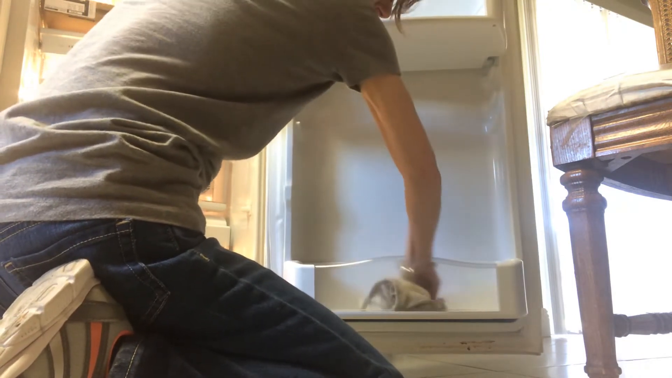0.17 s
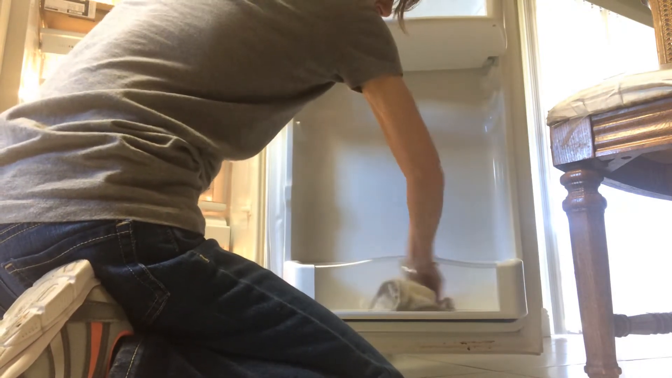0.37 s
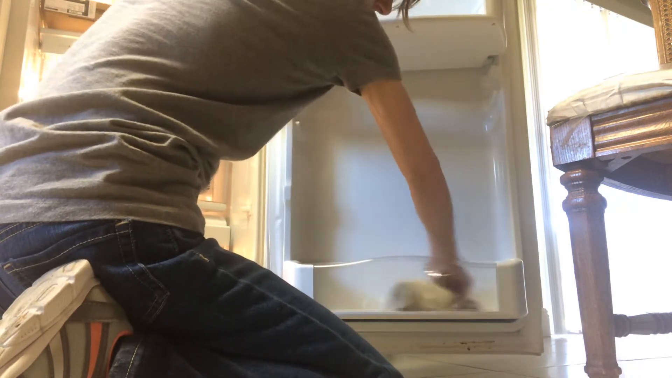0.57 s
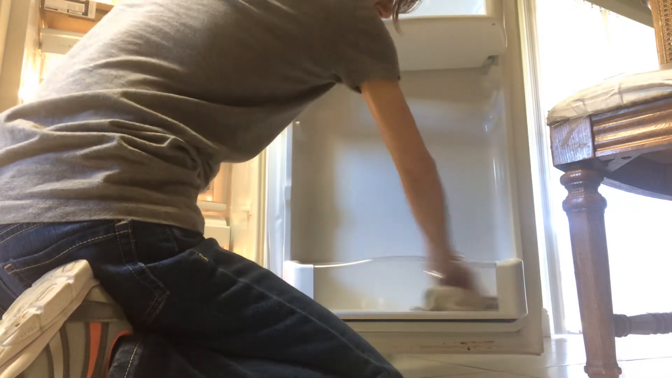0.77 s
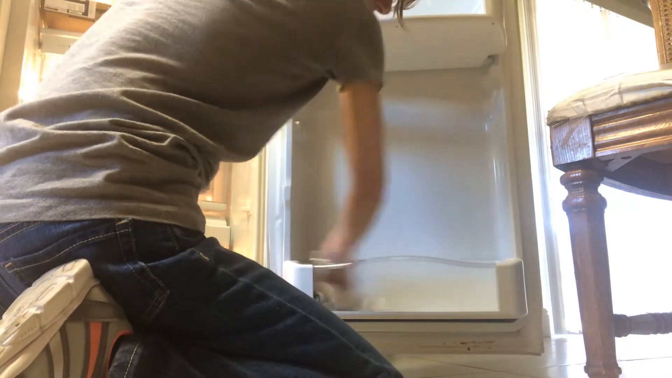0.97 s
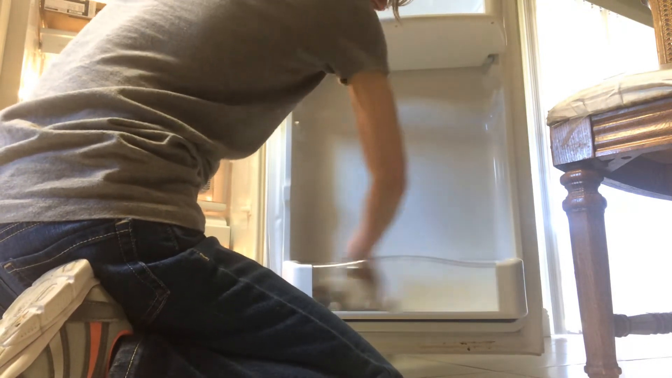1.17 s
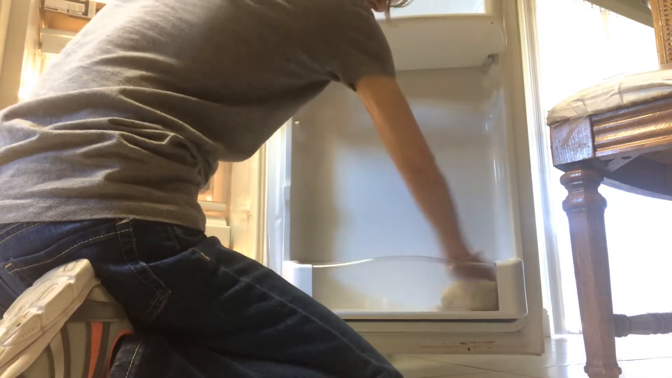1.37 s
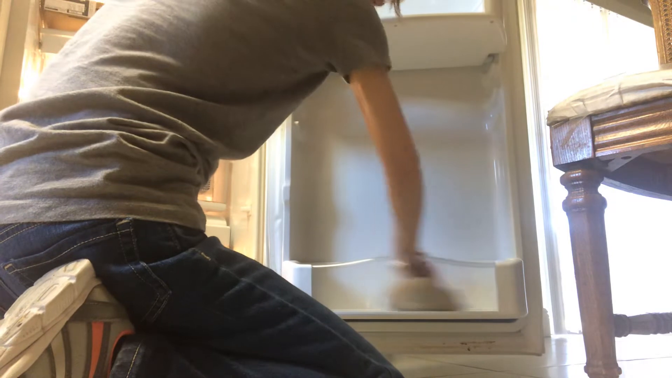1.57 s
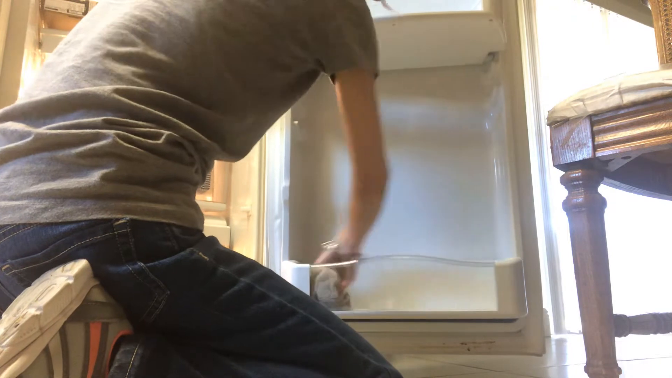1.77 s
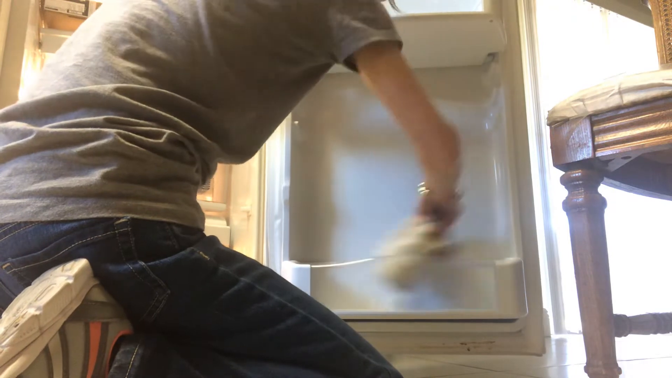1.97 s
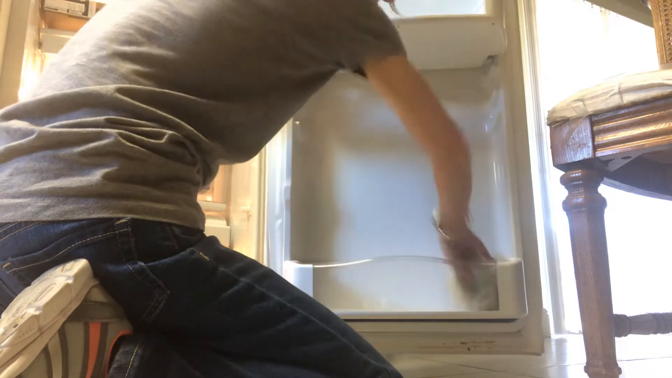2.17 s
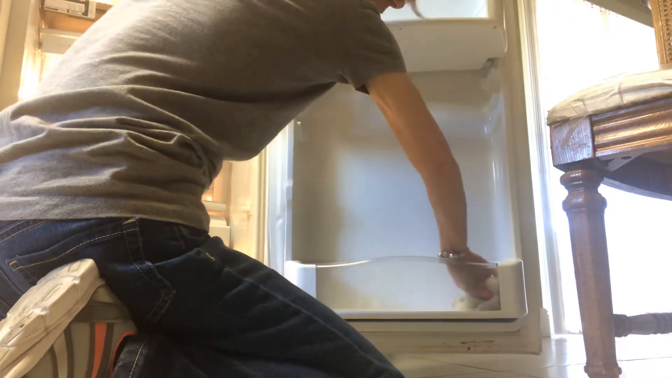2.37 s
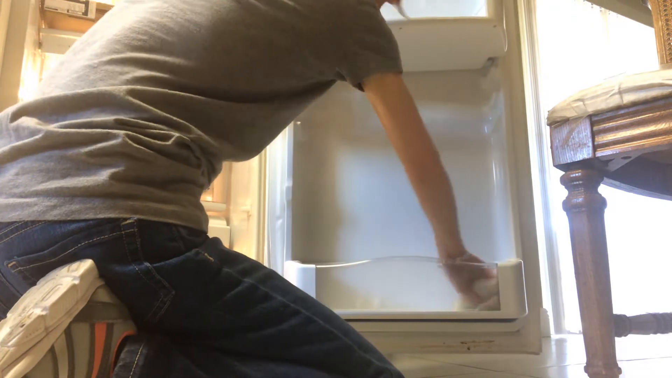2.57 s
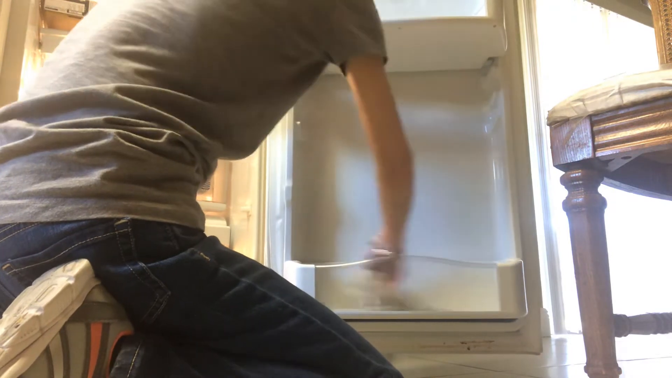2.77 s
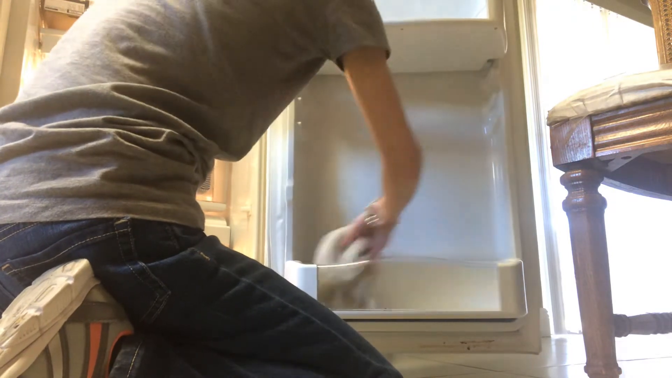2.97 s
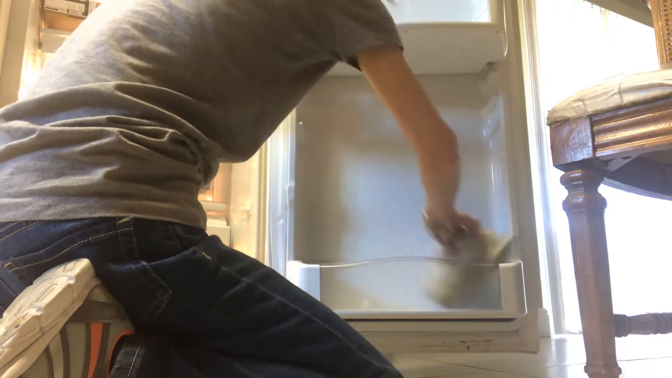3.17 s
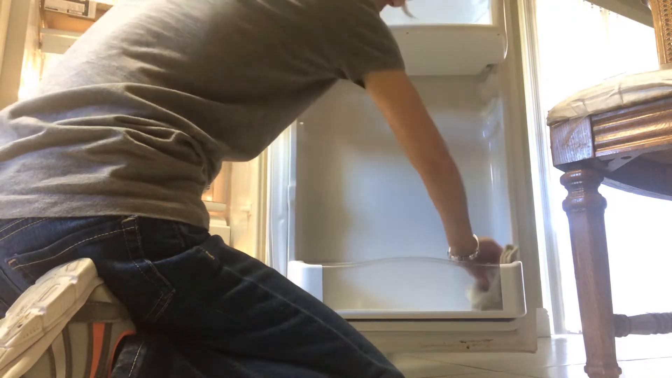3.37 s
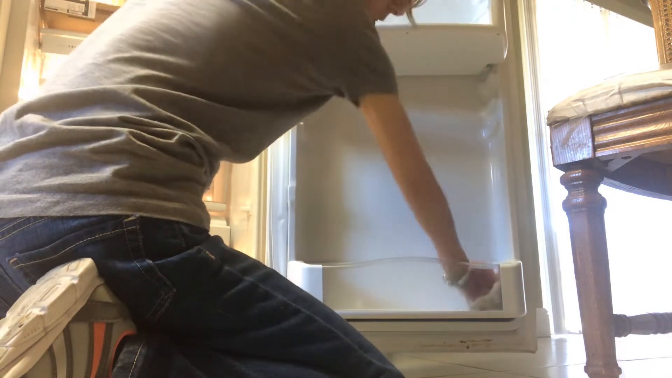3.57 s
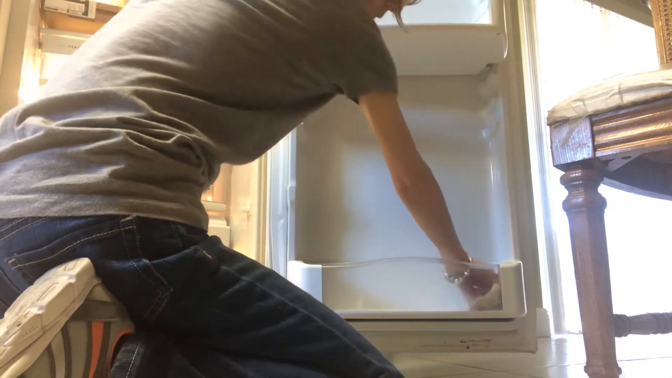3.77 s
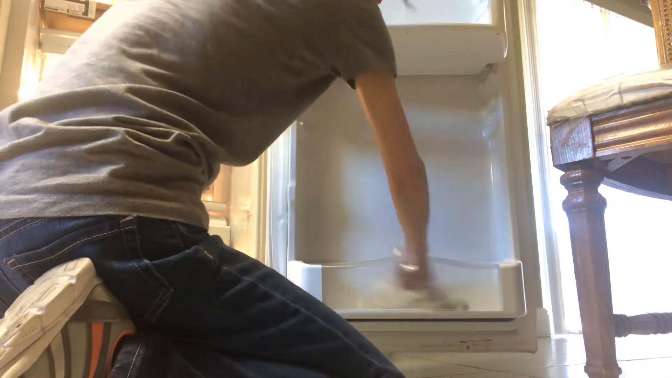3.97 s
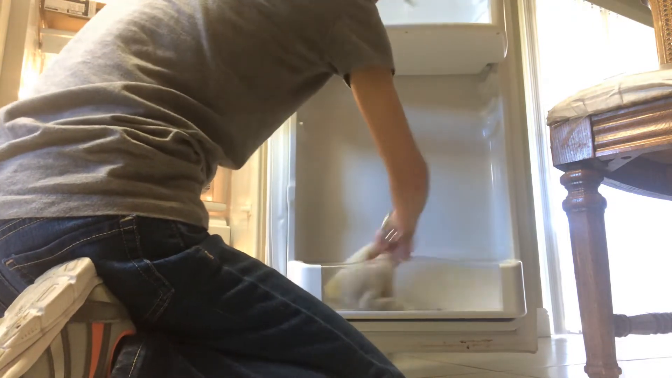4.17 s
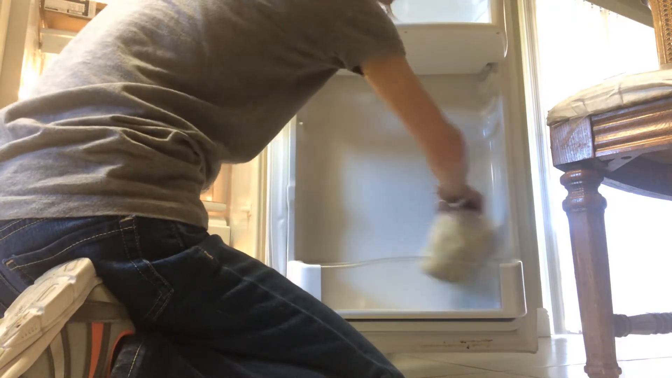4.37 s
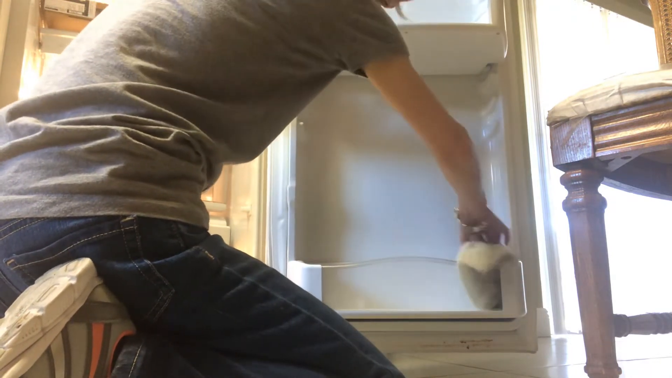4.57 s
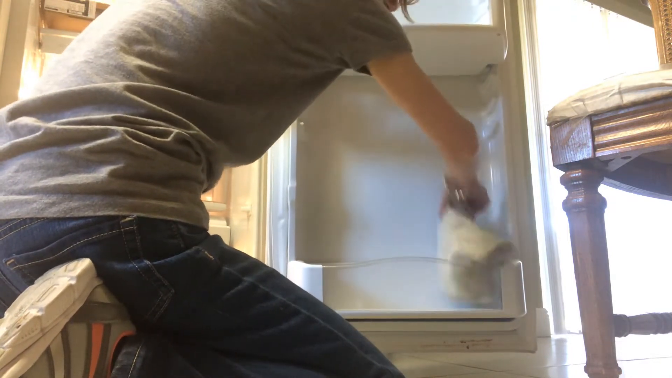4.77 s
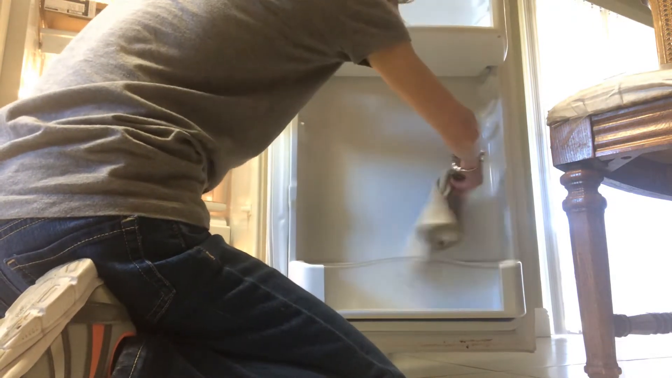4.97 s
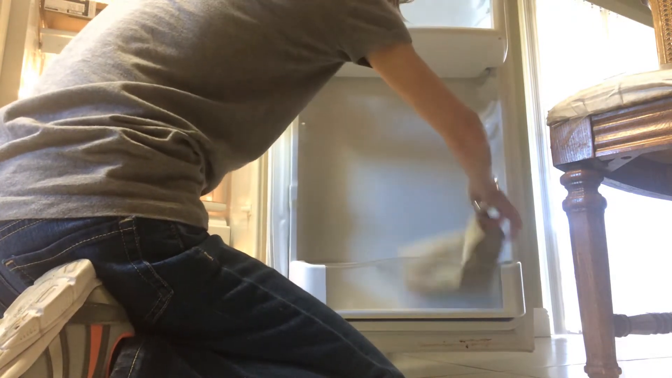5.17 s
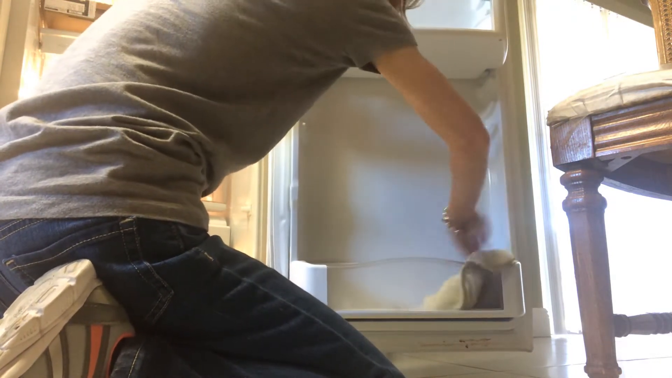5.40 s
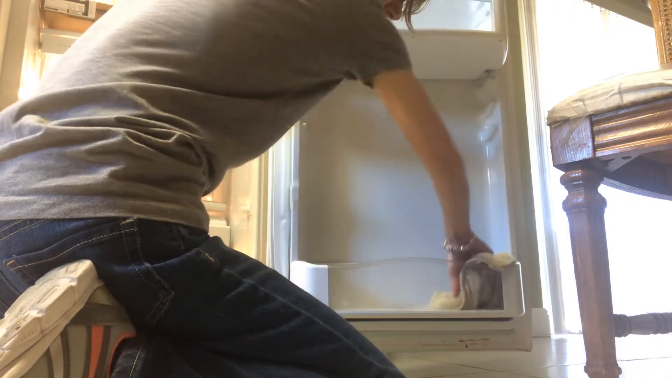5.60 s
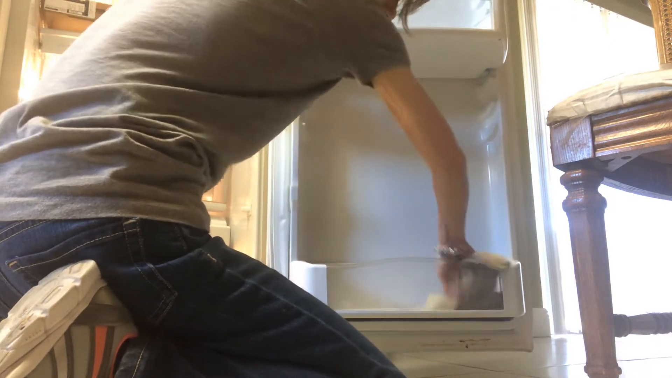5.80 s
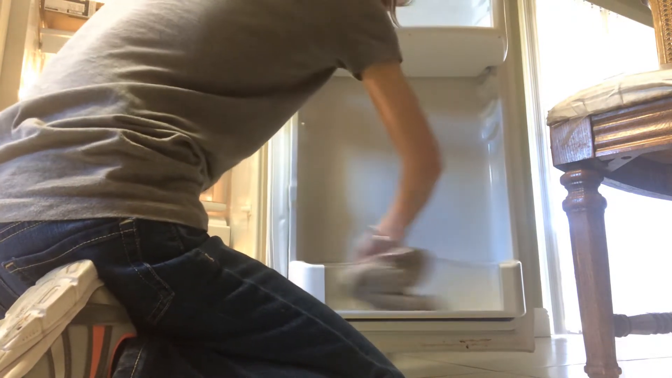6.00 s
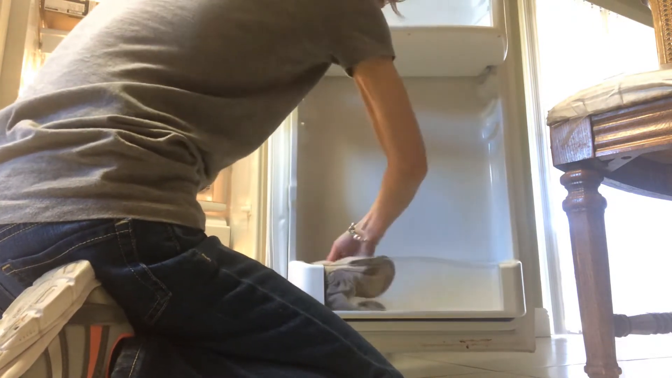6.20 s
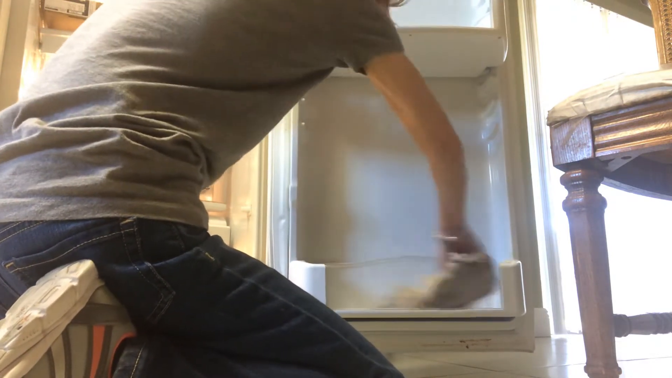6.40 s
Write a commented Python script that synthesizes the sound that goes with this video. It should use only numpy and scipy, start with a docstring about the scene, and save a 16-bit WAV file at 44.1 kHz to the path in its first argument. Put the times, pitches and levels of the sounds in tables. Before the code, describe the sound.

Close by in a quiet, hard-surfaced kitchen, a cloth rubs a plastic refrigerator door bin with faint, breathy strokes. Loud hollow plastic clacks stand out early and at just over two seconds, followed by a short judder and more rattles until about four seconds. After a quieter second, padded hand bumps thud low. A bracelet ticks lightly, and a weak, wavering refrigerator hum continues underneath.

```python
"""A quiet kitchen: a cloth wipes the inside of a plastic refrigerator door bin.
Filtered noise and tiny snags make the cloth's hiss, and low noise the rumble of the door.
The loose bin rings in fading tones and noise as it clacks and judders in its seat. The padded hand
bumps its walls in a few low cycles, and a bracelet ticks in short bright bursts of noise.
The refrigerator hums in wavering sines and a rush of air; the hard room adds a short noise tail."""
import sys
import numpy as np
from scipy import signal
from scipy.fft import rfft, irfft
from scipy.io import wavfile

SR = 44100
rng = np.random.default_rng(int(sys.argv[2]) if len(sys.argv) > 2 else 0)


def to_wav(s):
    """Save 16-bit WAV."""
    ch = np.atleast_2d(s).T  # columns
    pcm = np.round(np.clip(ch, -1, 1) * 32767)  # PCM
    wavfile.write(sys.argv[1], SR, pcm.astype(np.int16))


N = 284004

# the refrigerator's motor and fan, middle level of each wavering line: [f/Hz, rms level/dB]
MOTOR_LINES = [(99, -69.5), (149.5, -58.5), (248.5, -62.5), (432.5, -57), (648.5, -66), (759, -70),
               (866, -80), (1081.5, -64), (1245, -74.5), (1513.5, -76)]
# the rush of air, relative: [f/Hz, density/dB per Hz]
AIR_COLOUR = [(20, -53.5), (38, -26), (47, 2.5), (58, 3), (72, -5.5), (130, -2), (200, -9), (400, -7),
              (550, -9.5), (750, -13.5), (900, -18), (1350, -23), (1900, -26), (4000, -32.5), (7500, -39),
              (9000, -47), (16000, -54)]
# level of the fan's whine over time: [t/s, rms level/dB]
FAN_WHINE = [(0, -61), (1.2, -58), (2.1, -57.5), (3.1, -71.5), (3.9, -64), (4.4, -76), (4.8, -65.5),
             (5.4, -63.5), (6.43, -66)]
# strokes of the cloth, to and fro: [start t/s, length/s, effort level/dB before it sags]
WIPE_STROKES = [(-0.07, .17, -57), (0.182, 0.21, -60), (0.433, 0.34, -56), (0.822, 0.27, -59),
                (1.14, 0.2, -62), (1.445, 0.37, -61), (1.887, .11, -61), (2.188, 0.51, -61),
                (2.575, .36, -59), (3.184, 0.091, -73.5), (3.432, .16, -73), (3.814, .15, -60),
                (3.99, 0.24, -67), (5.113, 0.21, -79.5), (5.443, 0.19, -69.5), (5.756, 0.41, -60.5),
                (6.257, .2, -65)]
# the hand shoves into a corner and the door rumbles, relative: [t/s, level/dB]
CORNER_SHOVES = [(-0.02, -35.5), (1.43, -29.5), (2.70, -40), (5.335, -43.5), (6.34, -45)]
# hiss of the cloth on plastic, relative: [f/Hz, density/dB per Hz]
CLOTH_COLOUR = [(400, -10.5), (1500, -1), (2300, 1.5), (4000, 1), (6000, 1.5), (7600, 4), (8700, -1.5),
                (13000, 0.5), (16000, -4.5)]
# rumble of the door under the hand, relative: [f/Hz, density/dB per Hz]
RUMBLE_COLOUR = [(50, -15.5), (90, 0), (150, -1), (330, -2.5), (480, -4), (700, -22.5), (1500, -18.5),
                 (4000, -57.5)]
# the bracelet ticks on the plastic, relative: [t/s, level/dB]
BRACELET_TICKS = [(0.098, -49), (0.240, -67), (0.479, -60), (1.095, -52), (1.345, -24.5), (1.402, -33),
                  (1.823, -47.5), (1.911, -46.5), (1.929, -45), (2.151, -51.5), (2.198, -51.5),
                  (2.239, -52), (5.523, -45), (5.727, -58.5)]
# the padded hand bumps a wall, before the door joins in: [t/s, level/dB, basic pitch f/Hz, rise time/s]
HAND_BUMPS = [ (0.177, -26.5, 335, 0.0049), (0.231, -26, 324, .01), (0.255, -32, 333, .006),
              (0.422, -29.5, 390, 0.006), (0.484, -32, 353, .0042), (1.192, -37.5, 308, 0.019),
              (1.411, -23, 300, 0.0044), (1.423, -22, 313, 0.0093), (1.718, -39, 402, 0.0066),
              (1.997, -34, 416, 0.012), (2.025, -32.5, 420, .007), (2.235, -36, 405, 0.017),
              (2.634, -20.5, 363, 0.0096), (2.672, -30, 246, 0.0081), (3.282, -38.5, 443, .012),
              (5.182, -34.5, 410, 0.0041), (5.323, -37, 336, 0.01), (5.564, -21, 319, 0.012),
              (5.821, -17.5, 338, 0.0085), (5.86, -36, 220, .0062), (6.304, -27, 349, 0.011)]
# the shudder after a bump, relative: [f/Hz, density/dB per Hz]
SHUDDER_COLOUR = [(70, -14.5), (140, 3.5), (250, 3), (480, 8), (620, -10.5), (1600, -23.5), (3000, -25),
                  (9000, -48.5)]
# the bin knocks, relative: [t/s, level/dB, contact cut-off f/Hz (high when hard),
# low thud level/dB against the strength, ring time factor]
BIN_KNOCKS = [ (0.7365, 2.5, 1114, -9.5, 0.38), (0.747, -10.5, 1100, 2, .8), (1.037, -32, 2780, -5, 0.62),
              (1.14, -19, 2380, 3, 0.42), (1.344, -19, 5800, 5, 1.06), (1.367, -9, 8000, 4.5, 0.44),
              (1.372, -5, 1770, 7.5, 0.59), (2.3258, 2.5, 10500, -1.5, 0.94), (2.339, 0, 1650, 3.5, 0.67),
              (2.436, -8.5, 5740, -3.5, 0.81), (2.527, -19, 3730, 3.5, 1.15),
              (2.579, -14.5, 1690, 0.5, 2.2), (2.632, -9, 1910, 3.5, 1.03), (2.651, -12.5, 4400, -13, 2.47),
              (2.842, -10, 6050, -6, 0.73), (3.342, -12, 3070, 4.5, 1.42), (3.445, -17, 1830, -2.5, 1.3),
              (3.476, -12, 1800, -2.5, 1.9), (3.516, -10, 1780, -1, 1), (3.551, -9.5, 9700, -5.5, 0.83),
              (3.79, -25, 1810, 4, 0.49), (4.119, -5, 3000, 5, 0.84), (4.130, -11, 10960, 6.5, 1.5),
              (5.120, -34, 3370, 1.5, 0.58), (5.343, -24, 1910, 9, 0.73), (5.565, -32, 1720, 5, 2.5),
              (5.826, -22.5, 1900, 16, 0.46), (5.851, -11.5, 2550, 0.5, 0.79)]
# clear tones of the free bin, before a blow changes them: [f/Hz, level/dB, t60/s]
BIN_TONES = [(250, -39, 0.36), (361, -23, 0.23), (417.2, -14, 0.12), (474, -26, 0.13), (517.2, -19, 0.14),
             (760, -24.5, 0.11), (886.6, -32, 0.17), (1099, -34.5, 0.26), (1158, -18.5, 0.063),
             (1413, -24, 0.11), (1580, -23, .12), (1682, -20.5, 0.055), (2770, -28.5, 0.035),
             (2730, -23.5, 0.26), (3125, -28.5, 0.024), (3380, -30, .14), (4170, -27, 0.03),
             (4870, -36.5, 0.052)]
# its crowded higher modes, relative: [f/Hz, density/dB per Hz]
CROWD_COLOUR = [(70, -33), (200, -63.5), (600, 1.5), (900, 1.5), (1600, -7), (2050, -3.5), (2800, -3),
                (3800, -4.5), (4800, -3.5), (7400, -7.5), (8800, -13.5), (12500, -11), (16000, -22.5)]
# their fading time, before a blow's ring factor: [f/Hz, t60/s]
CROWD_FADE = [(500, 0.026), (2000, 0.062), (6000, 0.056), (12000, 0.045)]
# the bin sticks and slips in its seat, relative: [start t/s, end t/s, slip level/dB]
BIN_JUDDERS = [(2.604, 2.645, -30.5), (2.651, 2.688, -14), (2.698, 2.762, -34), (3.412, 3.488, -29.5),
               (3.479, 3.536, -16.5)]
# filter on each slip: [f/Hz, level/dB]
SLIP_COLOUR = [(250, -7), (450, -0.5), (1000, -27), (1550, 5.5), (2600, -12.5), (6000, -17), (14000, -23)]
# resonances the hollow door adds to every blow, against the blow: [f/Hz, level/dB at the peak]
DOOR_TONES = [(740, -0.5), (868, 2), (1105, -1.5), (1500, -1.5), (1704, 6), (2480, -5), (2923, 2.5),
              (3110, 1), (3940, 0), (4652, -1.5), (7232, -3.5)]
# fading time of the room's tail: [f/Hz, t60/s]
ROOM_FADE = [(150, 0.085), (500, 0.68), (1400, .62), (3500, 0.61), (7000, 0.5), (12000, 0.32)]
# colour of the room's reflections, relative: [f/Hz, level/dB]
REFLECTION_COLOUR = [(150, 7), (400, -3.5), (1400, 4), (4000, -2), (7000, 0.5), (10000, -2.5), (16000, 0)]

TIME = np.arange(N) / SR
RING = 12288  # samples in one short sound
RING_T, RING_HZ = np.arange(RING) / SR, np.fft.rfftfreq(RING, 1 / SR)
WHINE_HZ, TICK_HZ = 1295, 10500
EDGE_HZ = 16300  # the recorder's upper limit
# the hand speeds up, eases off along the wall and turns
STROKE_RISE_S, STROKE_STOP_S, STROKE_SAG_DB_PER_S = 0.087, 0.055, 20
RESTING_DB = -83  # the cloth barely stirs between strokes
SHOVE_RISE_S, SHOVE_FADE_S = 0.056, 0.053
# the hand's load lowers the bin's modes, a little differently each time
PRESSED_PITCH, PITCH_SCATTER = 0.96, 0.02
# how fast a blow with this cut-off weakens above it; padded blows fall off faster
CONTACT_DB_PER_OCTAVE, CONTACT_HZ, PADDING = 13, 2840, 0.55


def gain_of(db):
    """Turns decibels into a factor."""
    return 10 ** (np.asarray(db) / 20)


def evened(x):
    """Scales to rms 1."""
    return x / np.sqrt(np.mean(x ** 2) + 1e-20)


def read(points, hz):
    """Reads a table on a log-frequency axis."""
    f, value = np.transpose(points)
    return np.interp(np.log(hz + 1), np.log(f + 1), value)


def level(curve):
    """Turns a curve of (t/s, level/dB) into a gain for every sample."""
    return gain_of(np.interp(TIME, *np.transpose(curve)))


def add(mix, s, sound):
    """Mixes a sound in at s seconds."""
    part = mix[max(round(s * SR), 0):][:len(sound)]
    part += sound[:len(part)]


def noise(colour, size):
    """Makes noise of rms 1 with the given spectrum and random phases."""
    hz = np.fft.rfftfreq(size, 1 / SR)
    phases = np.exp(2j * np.pi * rng.random(len(hz)))
    return evened(irfft(gain_of(read(colour, hz)) * phases, size))


def drift(rate_hz):
    """Makes a slow random wander of rms 1."""
    hz = np.fft.rfftfreq(N, 1 / SR)
    return evened(irfft(rfft(rng.standard_normal(N)) * np.exp(-(hz / rate_hz) ** 2), N))


def dying(x, t60s):
    """Lets each band die at its own speed."""
    hz, t, bands = signal.stft(x, SR, nperseg=256)
    fade_db = -60 * t / read(t60s, hz)[:, None]
    return signal.istft(bands * gain_of(fade_db), SR, nperseg=256)[1][:len(x)]


def swell(start, length, rise_s, fade_s):
    """An envelope that rises, holds until its length is over, and fades."""
    t = TIME - start
    return np.clip(t / rise_s, 0, 1) * np.exp(-np.maximum(t - length, 0) / fade_s)


def refrigerator(air_db=-53, waver=0.001528, throb_db=-2.74):
    """Faint wavering lines and a fan's whine in a soft rush of air."""
    clock = TIME + waver * np.cumsum(drift(3.64)) / SR  # all pitches waver together
    lines = np.zeros(N)
    for hz, db in MOTOR_LINES:
        lines += gain_of(db + throb_db * drift(6.3)) * np.sin(2 * np.pi * (hz * clock + rng.random()))
    whine = level(FAN_WHINE) * np.sin(2 * np.pi * WHINE_HZ * clock)
    air = gain_of(air_db) * noise(AIR_COLOUR, N)
    return np.sqrt(2) * (lines + whine) + air  # a sine of rms 1 peaks at the root of 2


def wiping():
    """The effort of the hand: each stroke starts firmly, eases and stops."""
    effort = np.full(N, gain_of(RESTING_DB))
    for s, length, db in WIPE_STROKES:
        sagging_db = db - STROKE_SAG_DB_PER_S * np.clip(TIME - s, 0, length)
        effort += swell(s, length, STROKE_RISE_S, STROKE_STOP_S) * gain_of(sagging_db)
    return effort


def cloth(hiss_db=3.5, flutter_db=2, snags_per_s=500, snag_db=3, scuff_db=-3, scuff_hz=4000,
          grip_db=7.0, lumps_db=3, rub_db=9, lean_db=-60, shove_db=-2):
    """Fibres hiss and snag along the plastic while the door rumbles under the hand."""
    chance, size = rng.random((2, N))
    snag_hits = (chance < snags_per_s / SR) * size ** 2
    snags = signal.lfilter([1], [1, -.96], snag_hits)  # each hit fades within a few milliseconds
    fibres = noise(CLOTH_COLOUR, N) * (1 + gain_of(snag_db) * snags)
    # the scuff comes and goes as the wet folds grip
    low_pass = signal.butter(2, scuff_hz, fs=SR, output="sos")
    scuff = signal.sosfilt(low_pass, noise(CLOTH_COLOUR, N)) * gain_of(scuff_db + grip_db * drift(15))
    hiss = (evened(fibres) + scuff) * gain_of(flutter_db * drift(28))
    rumble = noise(RUMBLE_COLOUR, N) * gain_of(lumps_db * drift(6.7))
    effort = wiping()
    shoves = np.zeros(N)
    for s, db in CORNER_SHOVES:
        shoves += gain_of(db) * swell(s - SHOVE_RISE_S, SHOVE_RISE_S, SHOVE_RISE_S, SHOVE_FADE_S)
    pressure = gain_of(lean_db) + gain_of(rub_db) * effort + gain_of(shove_db) * shoves
    return gain_of(hiss_db) * effort * evened(hiss) + pressure * evened(rumble)


def ticks(ring_s=0.0046, low_db=-9, top_db=-6):
    """Tiny bright clicks of metal on plastic: bursts of noise that die fast."""
    out = np.zeros(N)
    colour = [(TICK_HZ / 20, -20), (TICK_HZ / 5, low_db), (TICK_HZ / 2, -2), (TICK_HZ, 0),
              (TICK_HZ * 2, top_db)]
    for s, db in BRACELET_TICKS:
        add(out, s, gain_of(db) * noise(colour, RING) * np.exp(-RING_T / ring_s))
    return out


def bumps(sharpness=5, sag=0.17, shudder_db=-14, shudder_s=0.058):
    """The cloth damps the wall it pushes: a few low cycles swell and sag, and the door shudders."""
    out = np.zeros(N)
    for s, db, hz, rise in HAND_BUMPS:
        u = RING_T / rise  # time, counted in rise times
        turns = np.cumsum(hz * (1 + sag * np.clip(1.3 - u, -1, 1))) / SR  # the pitch sags
        push = (u * np.exp(1 - u)) ** sharpness * np.sin(2 * np.pi * turns)
        shudder = noise(SHUDDER_COLOUR, RING) * np.minimum(2 * u, 1) * np.exp(-RING_T / shudder_s)
        add(out, s, gain_of(db) * (push + gain_of(shudder_db) * shudder))
    return out


def causal(colour):
    """Frequency response of the quickest filter with this colour (minimum phase)."""
    log_gain = np.log(gain_of(read(colour, RING_HZ)))
    circle = np.concatenate([log_gain, log_gain[-2:0:-1]])
    return np.exp(np.conj(signal.hilbert(circle)))[:len(RING_HZ)]


def bin_ring(colour, pitch, ring, modes_db, crowd_db=-9.5, spread_db=0.46, lag_s=.004,
             fast_hz=4500, fill_s=0.0028):
    """One blow on the bin: a few clear modes over a crowd of short ones."""
    hz, db, t60 = np.transpose(BIN_TONES)[:, :, None]
    db = db + modes_db + spread_db * rng.standard_normal(db.shape)  # each blow lands somewhere else
    waves = np.sin(2 * np.pi * (hz * pitch * RING_T + rng.random(hz.shape)))
    modes = gain_of(db - 60 * RING_T / (t60 * ring)) * waves
    crowd = gain_of(crowd_db) * dying(noise(CROWD_COLOUR, RING), np.multiply(CROWD_FADE, [1, ring]))
    filling = 1 - np.exp(-RING_T / (fill_s * ring)) / 2  # the blow takes a moment to spread over the walls
    # bending waves are slower in the bass, so the thud follows the crack
    slowness = np.sqrt(hz[1] / np.clip(RING_HZ, hz[0], fast_hz))
    delay_s = lag_s * (slowness - slowness[-1])
    late = np.exp(-2j * np.pi * np.cumsum(delay_s) * SR / RING)
    sound = irfft(rfft(filling * (modes.sum(0) + crowd)) * late * causal(colour))
    return sound * np.cos(np.linspace(0, np.pi / 2, RING)) ** 2  # ends in silence


def knocks(modes_db, thud_hz=480, body_hz=750):
    """Soft contacts thud, hard ones crack and tick; each has its own ring time, shorter or longer."""
    out, hz = np.zeros(N), np.geomspace(40, SR / 2, 40)
    for s, db, cutoff_hz, thud, ring in BIN_KNOCKS:
        slope = CONTACT_DB_PER_OCTAVE * (CONTACT_HZ / cutoff_hz) ** PADDING
        # a soft contact lasts longer and cuts off lower
        contact = -10 * np.log10(1 + 10 ** (slope * np.log2(hz / cutoff_hz) / 10))
        body = read([(thud_hz / 6, thud - 15), (thud_hz / 2, thud), (thud_hz, thud), (body_hz, 0)], hz)
        pitch = PRESSED_PITCH + PITCH_SCATTER * rng.standard_normal()
        colour = np.column_stack([hz, contact + body])
        add(out, s, gain_of(db) * bin_ring(colour, pitch, ring, modes_db))
    return out


def judders(slips_per_s=150, jitter=.45, uneven_db=2.0, ring=0.54, modes_db=-4, slip_db=2.7):
    """Quick uneven slips, each a small damped blow on the bin."""
    out = np.zeros(N)
    for start, end, db in BIN_JUDDERS:
        late, size = rng.standard_normal((32, 2)).T  # at most 32 slips
        times = start + (np.arange(len(late)) + jitter * late) / slips_per_s
        rings = [bin_ring(SLIP_COLOUR, 1, ring, modes_db) for count in range(4)]  # used in turn
        for k in np.flatnonzero(times < end):
            add(out, times[k], gain_of(db + slip_db + uneven_db * size[k]) * rings[k % len(rings)])
    return out


def door(x, q=55, through_db=-1.5):
    """The blows pass through the narrow resonances of the hollow door."""
    resonances = np.zeros(N)
    for hz, db in DOOR_TONES:
        resonances += gain_of(db) * signal.lfilter(*signal.iirpeak(hz, q, fs=SR), x)
    return gain_of(through_db) * (x + resonances)


def kitchen(x, tail_db=-11.5, early_db=-10, early_s=.027, gap_s=0.0098, build_s=0.0021):
    """Quick reflections from the door and floor, then the tail of the room, both fading noise."""
    t = np.maximum(np.arange(SR) / SR - gap_s, 0)
    early = noise(REFLECTION_COLOUR, SR) * np.exp(-t / early_s) * (t > 0)
    tail = dying(noise(REFLECTION_COLOUR, SR), ROOM_FADE) * (1 - np.exp(-t / build_s))
    early *= gain_of(early_db) / np.linalg.norm(early)
    tail *= gain_of(tail_db) / np.linalg.norm(tail)
    return signal.oaconvolve(x, early + tail)[:N]


def scene(count=3):
    """All the handling sounds, the blows with their room echo, over the hum."""
    small = judders() + bumps() + ticks()
    direct = knocks(modes_db=-0.96) + small  # straight to the microphone
    # each wall of the bin sends its own ring along its own paths, so single modes blur in the tail
    room = sum(kitchen(knocks(modes_db=-4.0) + small) for wall in range(count)) / np.sqrt(count)
    return (door(direct + room) + cloth() + refrigerator())[None]


def record(dry, low_cut_hz=40):
    """The microphone's bass cut and the recorder's band limit."""
    bass_cut = signal.butter(4, low_cut_hz, "high", fs=SR, output="sos")
    lean = signal.sosfilt(bass_cut, dry)
    band_limit = signal.firwin(511, EDGE_HZ, window=("kaiser", 9), fs=SR)
    return signal.oaconvolve(lean, band_limit[None], "same")


dry = scene()
out = record(dry)
to_wav(out)
```